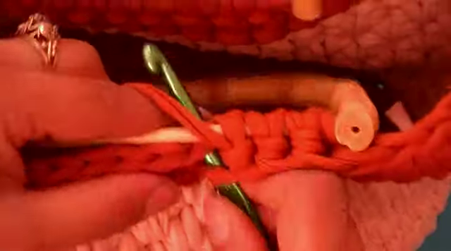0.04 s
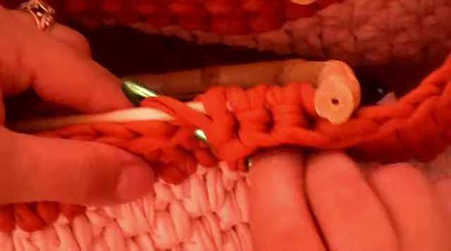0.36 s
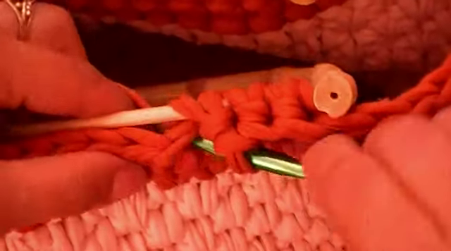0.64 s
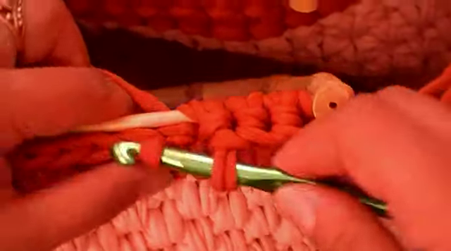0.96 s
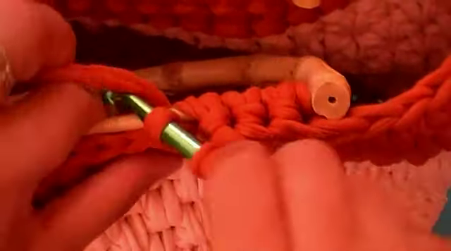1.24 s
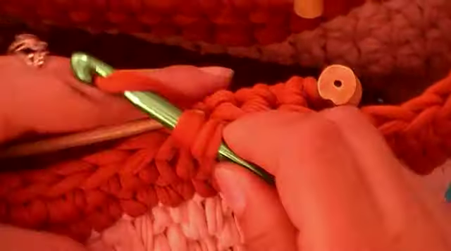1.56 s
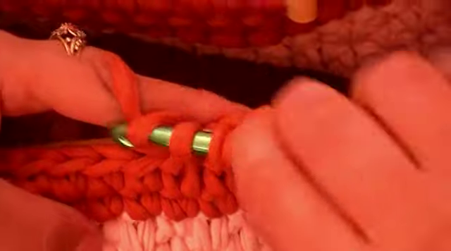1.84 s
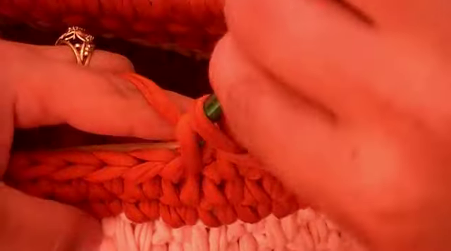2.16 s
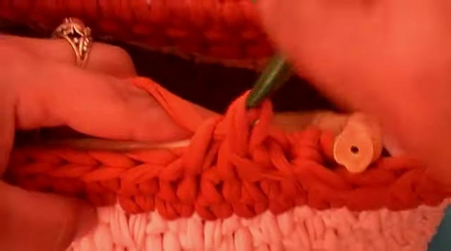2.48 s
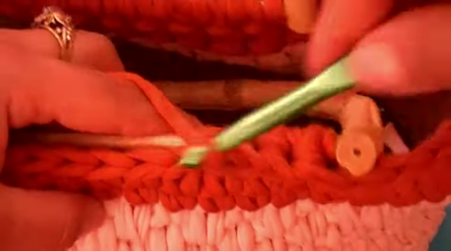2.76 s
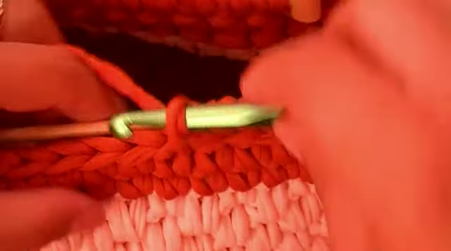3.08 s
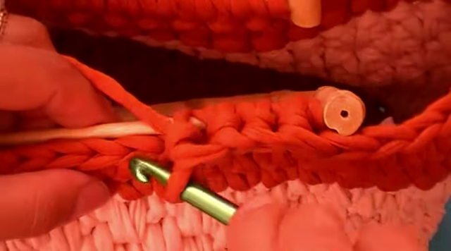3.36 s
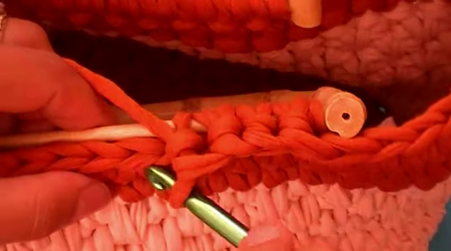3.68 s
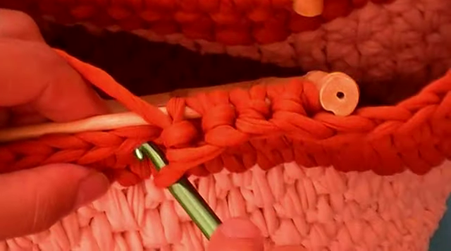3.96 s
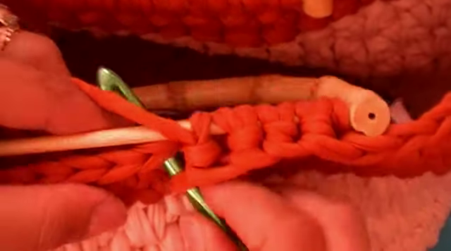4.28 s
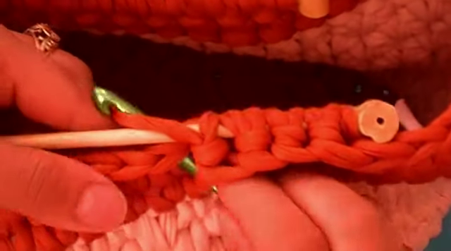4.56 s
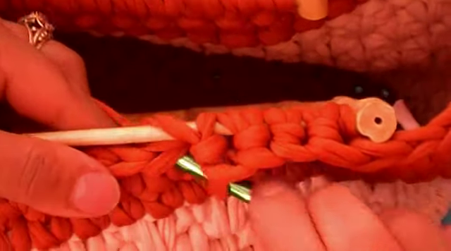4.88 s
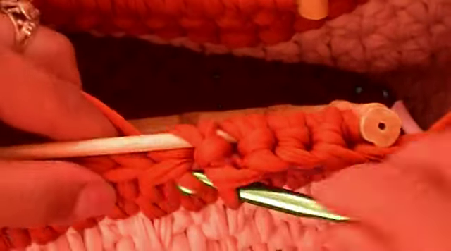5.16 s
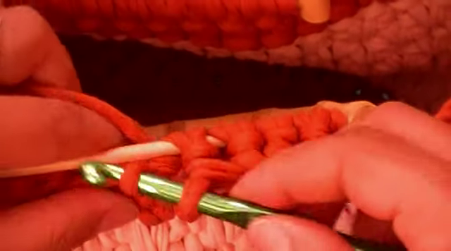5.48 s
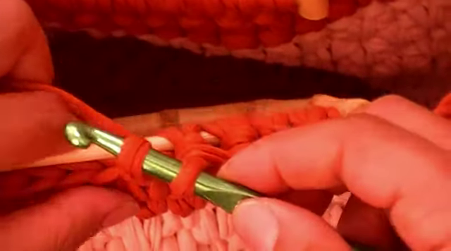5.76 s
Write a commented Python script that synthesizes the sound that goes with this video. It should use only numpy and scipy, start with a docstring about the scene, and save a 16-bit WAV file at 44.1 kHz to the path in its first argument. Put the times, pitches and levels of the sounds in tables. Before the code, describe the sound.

Faint, close crocheting with sliding yarn and clicks of hook on bamboo, briefly joined by a distant echoing clatter.

```python
"""Thick yarn hisses over a metal hook as it is crocheted round a thin wooden rod, close by.
Each pull makes countless tiny fibres slip and snag, and the hands shift the heavy fabric with a dull
rustle. The hook and the bag's bamboo handle give two sharp clicks and some light ticks.
Further off, something hard clatters three times and the room echoes.
Behind it all are a soft rush of air and the hum of an appliance."""
import sys
import numpy as np
from scipy import signal
from scipy.fft import rfft, irfft, next_fast_len
from scipy.io import wavfile
from scipy.ndimage import uniform_filter1d, map_coordinates

SR = 44100
rng = np.random.default_rng(int(sys.argv[2]) if len(sys.argv) > 2 else 0)


def store_wav(level_fs):
    """Save 16-bit WAV to argv[1]."""
    pcm = np.round(np.clip(np.atleast_2d(level_fs), -1, 1) * 32767)
    wavfile.write(sys.argv[1], SR, pcm.T.astype(np.int16))


N = 261513


# tone of the fibres' bright hiss (frequency [Hz], level [dB])
HISS_TONE = [(2500, -14), (5000, -7), (6500, -2), (8300, 3), (10000, -0.5), (12000, -11), (14500, -21),
             (16000, -54)]
# tone of strands rubbing on each other (frequency [Hz], level [dB])
RUB_TONE = [(300, 3.5), (900, 6.5), (1800, 6), (3000, 4), (4500, 2.5), (6500, -2.5), (10000, -30)]
# how alike the yarn sounds in both ears (frequency [Hz], likeness [-1 to 1])
YARN_LIKENESS = [(200, 0.29), (700, 0.63), (1300, 0.12), (2400, 0.83), (4400, 0.9), (8000, 1), (9000, 0.81),
                 (11000, 0.45), (15000, 1)]

def yarn(hiss_gain, rub_gain):
    """Strands hiss over the hook and rub on each other; the grip wavers as they are pulled."""
    grip = wobble(35)
    fibres = friction(snags_per_s=990, snag_share=0.4, spread_db=3)
    hiss = hiss_gain * amp(1.45 * grip) * stereo(fibres, HISS_TONE, YARN_LIKENESS)
    strands = friction(snags_per_s=450, snag_share=0.19, spread_db=4)
    rub = rub_gain * amp(1.63 * grip) * stereo(strands, RUB_TONE, YARN_LIKENESS)
    # one taut loop is dragged along the hook
    loop = friction(snags_per_s=780, snag_share=0.32, spread_db=-4)
    drag_tone = [(5000, -8), (6100, -4.5), (7500, 0.5), (9500, -14), (13000, -29)]
    drag_gain = amp(-52) * slide_speed(peak_s=5.595, length_s=0.15)
    return hiss + rub + drag_gain * stereo(loop, drag_tone, YARN_LIKENESS)


# each slide of yarn over hook, rod or fingers
# (time when fastest [s], length [s], hiss level [dB], pressure: rub compared with hiss [dB])
YARN_SLIDES = [(0.039, 0.079, -54, -2), (0.14, 0.21, -62, 0), (0.254, 0.076, -55, -0.5),
               (0.35, 0.19, -58, -1), (0.43, 0.058, -56.5, -0.5), (0.48, 0.055, -63, 5.5),
               (0.573, 0.071, -63, 1.5), (0.69, 0.071, -58.5, -0.5), (0.756, 0.17, -54.5, -1.5),
               (0.886, 0.099, -60, -1), (0.912, 0.082, -52, -6), (0.99, 0.14, -65, 1),
               (1.172, 0.15, -58, -2.5), (1.278, 0.17, -66, -8), (1.383, 0.019, -55, 1.5),
               (1.436, 0.12, -54, -1.5), (1.6, 0.27, -54, -5.5), (1.682, 0.088, -59.5, 3.5),
               (1.758, 0.046, -54.5, 3), (1.814, 0.19, -57.5, 4.5), (2.35, 0.089, -49, -20),
               (2.48, 0.089, -62, -7), (2.6, 0.18, -60.5, -4), (2.698, 0.16, -57, -11),
               (2.794, 0.09, -64, -2), (2.87, 0.079, -57.5, -5), (2.938, 0.066, -63.5, 1),
               (3.057, 0.22, -59.5, -5), (3.277, 0.13, -67, -3), (3.53, 0.029, -70, 1),
               (3.59, 0.02, -63.5, 2.5), (3.985, 0.069, -70.5, 2), (4.171, 0.12, -60.5, -0.5),
               (4.234, 0.044, -68, 8), (4.31, 0.088, -52.5, 1.5), (4.399, 0.14, -59, -0.5),
               (4.552, 0.14, -58.5, 0), (4.637, 0.099, -65.5, 1.5), (4.803, 0.11, -63, -1),
               (4.902, 0.1, -57.5, -0.5), (5.035, 0.12, -65.5, 2.5), (5.176, 0.092, -50, -5.5),
               (5.287, 0.072, -55, -1), (5.4, 0.35, -59.5, 0), (5.589, 0.15, -52.5, -15),
               (5.842, 0.18, -57.5, -2)]

def slide_gains():
    """Faster slides hiss and rub louder; pressing harder adds more rub."""
    # the yarn creeps a little even while it is only held
    hiss_power, rub_power = np.full(N, amp(-76) ** 2), np.full(N, amp(-81) ** 2)
    for s, length, db, pressure_db in YARN_SLIDES:
        speed = slide_speed(s, length)
        hiss_power += (amp(db) * speed) ** 2
        rub_power += (amp(db + pressure_db) * speed ** 0.9) ** 2  # rub grows more slowly than hiss
    return np.sqrt(hiss_power), np.sqrt(rub_power)


def slide_speed(peak_s, length_s):
    """The speed of one hand movement, 0 to 1: it builds up, peaks and eases off."""
    rise_share, roundness = 0.54, 1.5  # part spent speeding up; 1 = pointed peak, 2 = round bell
    t = np.arange(N) / SR - peak_s
    from_peak = np.abs(t) / (length_s * np.where(t < 0, rise_share, 1 - rise_share))
    return np.where(from_peak < 4, np.exp(-from_peak ** roundness), 0)


def friction(snags_per_s, snag_share, spread_db):
    """Countless tiny slips make two noises; in the first, single fibres also snag and let go."""
    snags = (rng.random(N) < snags_per_s / SR) * rng.standard_normal(N)
    snags *= amp(spread_db * rng.standard_normal(N))
    return noise_pair(N) + snag_share * unit(snags) * np.array([[1], [0]])


# tone of the fabric's dull rustle (frequency [Hz], level [dB])
FABRIC_TONE = [(60, 0), (180, -3.5), (290, 10), (450, 6), (700, -5.5), (1200, 2), (2500, -92)]

def fabric(rub_gain):
    """Every slide tugs the heavy fabric, which follows sluggishly with a dull, lumpy rustle."""
    rest_db, tug_db, smoothing_s = -65.5, -6, 0.16
    tug = amp(tug_db) * uniform_filter1d(rub_gain, round(smoothing_s * SR))
    lumps = amp(1.6 * wobble(22))
    rustle = friction(snags_per_s=170, snag_share=0.8, spread_db=-2.5)
    return np.hypot(amp(rest_db), tug) * lumps * stereo(rustle, FABRIC_TONE, YARN_LIKENESS)


# the hook scuffing through tight loops (time [s], level [dB], length [s])
HOOK_SCUFFS = [(0.714, -55.5, 0.0066), (1.672, -47, 0.0043), (1.783, -45, 0.0076), (2.705, -50.5, 0.0066),
               (4.398, -59, 0.0092)]
# tone of a scuff (frequency [Hz], level [dB])
SCUFF_TONE = [(70, -25), (150, -2), (300, 5), (540, 23), (740, 5), (1100, -30), (2000, -2), (4000, -1),
              (8000, -30), (13000, -33)]

def hook_scuffs():
    """The hook's head rasps briefly as it squeezes through a loop."""
    rasp = friction(snags_per_s=660, snag_share=0.29, spread_db=3)
    return swells(HOOK_SCUFFS) * stereo(rasp, SCUFF_TONE, YARN_LIKENESS)


# soft bumps of the hands on the bag (time [s], level [dB], length [s])
HAND_BUMPS = [(1.972, -53.5, 0.04), (4.31, -57.5, 0.022), (5.3, -67, 0.045)]
# folds of the fabric shifting (time [s], level [dB], length [s])
FOLD_SHIFTS = [(0.25, -62, 0.052), (1.86, -55, 0.056), (2.0, -55.5, 0.036), (2.38, -53, 0.03),
               (5.31, -55, 0.06), (5.57, -65, 0.06)]
# tone of a shifting fold (frequency [Hz], level [dB])
FOLD_TONE = [(150, -37), (240, 4), (320, 6), (420, -6), (700, -44)]

def hands_on_bag():
    """Hands bump the soft bag with a low thud and shift its folds with a hollow rustle."""
    thud_tone = [(60, -33), (115, 15.5), (170, 16), (260, -22), (600, -71)]
    thuds = swells(HAND_BUMPS) * stereo(noise_pair(N), thud_tone, likeness=[(150, 0.59)])
    folds = swells(FOLD_SHIFTS) * stereo(noise_pair(N), FOLD_TONE, likeness=[(300, 0.35)])
    return thuds + folds


# clicks and ticks of hook and handle
# (time [s], level [dB], ping pitch [Hz], ping [dB], hardness [Hz], bamboo ring [dB], crunch [dB])
HANDLE_CLICKS = [(1.1681, -35.5, 5500, -13, 4770, 22, 12.5), (1.667, -44.5, 3040, -4, 2290, -6, 4),
                 (1.775, -46, 2000, 3, 4800, -12, 1), (1.7771, -37, 1930, 1.5, 4630, -12, 6.5),
                 (3.5856, -62, 5000, -16, 6000, -8, -6), (4.217, -50, 4000, -11, 4500, -13, -12),
                 (4.2905, -50, 4500, 4, 4840, -2, 2), (4.296, -52, 4550, 16, 6000, 3, 22),
                 (4.3032, -44.5, 2440, 18.5, 3300, 22, 4), (4.3947, -40, 7900, -2, 6200, -18, 1),
                 (4.5125, -41.5, 5960, -14, 5130, -19, -2.5), (5.363, -48, 8600, 1, 6500, -10, 0)]

def clicks():
    """Hook and handle touch close by; the first moments of every snap make the room echo."""
    snap_s, echo_db = 0.018, -12
    direct, snaps = np.zeros(N), np.zeros(N)
    for s, db, *character in HANDLE_CLICKS:
        tap = amp(db) * bamboo_tap(*character)
        add(direct, s, tap)
        add(snaps, s, tap * fade(np.arange(len(tap)) / SR, snap_s))
    echo_tone = [(300, 10), (700, 2), (1040, 8.5), (1500, 1), (2400, 3.5), (4200, 0), (5600, -1),
                 (8300, 2), (14000, -21)]
    echo = room_echo(echo_tone, likeness=[(300, 0.11), (6000, 0.56)])
    return direct + amp(echo_db) * signal.fftconvolve(snaps[None], echo, axes=1)[:, :N]


# the notes that bamboo and rod ring with (pitch [Hz], level [dB], time to fade by 60 dB [s])
BAMBOO_NOTES = [(322, -32, 0.11), (432, -32, 0.066), (680, -60, 0.045), (1040, -19.5, 0.05),
                (1490, -26, 0.026), (2020, -25, 0.0099), (2250, -20, 0.019), (3110, -17, 0.02),
                (4020, -10.5, 0.0067), (4480, -13, 0.0089), (5520, -3, 0.0031), (6400, -11, 0.0054),
                (7300, -14.5, 0.01), (8100, -13, 0.013)]

def bamboo_tap(ping_hz, ping_db, hardness_hz, ring_db, crunch_db):
    """One tap: a push and rebound, a brief ping where it lands, the bamboo's ring and a crunch."""
    t = np.arange(SR // 5) / SR
    contact = 2 * np.pi * hardness_hz * (t - 0.00015)  # a harder tap is briefer and brighter
    push = -2.6 * contact * np.exp(-contact ** 2 / 2)
    ping = amp(ping_db) * fade(t, 0.011) * np.sin(2 * np.pi * ping_hz * t)
    ring = sum(amp(db + rng.normal(0, 1)) * fade(t, fade_s) * np.cos(2 * np.pi * hz * t)
               for hz, db, fade_s in BAMBOO_NOTES)
    treble_cut = signal.butter(4, min(2 * hardness_hz, 15000), fs=SR, output="sos")
    ring = signal.sosfilt(treble_cut, ring)
    # the crunch: between the clear notes lie many crowded ones that die at once
    band_hz = np.clip([hardness_hz / 2, 1.8 * hardness_hz], [100, 2000], [6000, 10000])
    band_filter = signal.butter(3, band_hz, "band", fs=SR, output="sos")
    crunch = fade(t, 0.018) * signal.sosfilt(band_filter, rng.standard_normal(len(t)))
    return push + ping + amp(ring_db) * ring + amp(crunch_db) * crunch


# the distant blows (time [s], level [dB])
CLATTER_BLOWS = [(1.906, -42.5), (2.0320, -40.5), (2.2210, -38)]
# tone of their echo (frequency [Hz], level [dB])
CLATTER_TONE = [(120, -20), (215, -11), (260, -2), (430, -2.5), (700, -1.5), (900, -6.5), (1550, -7.5),
                (2000, -2.5), (2700, -3), (3200, -6), (3600, -5), (4000, -10.5), (5200, -3.5), (6500, -6.5),
                (10800, -8), (14500, -41)]
# the notes the hard thing rings with (pitch [Hz], blur [Hz], level [dB], time to fade by 60 dB [s])
CLATTER_NOTES = [(283, 35, -9, .6), (430, 30, -12.5, .45), (525, 25, -14, .4), (665, 20, -8.5, .42),
                 (745, 30, -14, .35), (1370, 40, -12, .35), (2920, 240, 4.5, .62), (2970, 65, -1, .8),
                 (3289, 35, -5, .5), (3560, 130, -2, .35), (6055, 45, -3, .38), (6708, 45, -3.5, .38)]

def clatter():
    """Each far blow cracks; the echo builds behind it, a wall throws it back and a thin ring lingers."""
    out = np.zeros((2, N))
    t = np.arange(SR) / SR
    wall_delay_s, wall_db = 0.027, -6.5
    wall = amp(wall_db) * np.exp(-((t - wall_delay_s) / 0.02) ** 2)
    build_up = 1 - np.exp(-t / 0.0033)
    likeness = [(150, 0.2), (400, 0.93), (1300, 0.74), (4000, 0.8), (8000, 0.42), (14000, 0.11)]
    for s, db in CLATTER_BLOWS:
        echo = room_echo(CLATTER_TONE, likeness)[:, :SR]
        echo /= np.std(echo[:, :SR // 40])  # its first 25 ms set the level
        add(out, s, amp(db) * np.hypot(build_up, wall) * echo)
        add(out, s - 0.006, amp(db) * crack(t))
        for hz, blur_hz, note_db, fade_s in CLATTER_NOTES:
            ring_gain = amp(db + note_db - 11) * fade(t, fade_s) * build_up
            add(out, s, ring_gain * blurred_ring(hz, blur_hz))
    return out


# the short, woody notes in each blow's crack (pitch [Hz], level [dB])
CRACK_NOTES = [(700, -3), (1350, -6.5), (2100, -13), (2920, -5), (3520, 1.5), (4850, -6), (5300, -11),
               (6050, 3.5), (6750, 0.5), (9900, -6), (10950, -6)]

def crack(t):
    """The start of a far blow: hollow notes and gritty noise flare up for a few milliseconds."""
    flare = np.exp(-np.abs(t - 0.0075) / 0.003)
    grit_tone = [(300, -8), (2000, 0), (3300, 6), (4300, -0.5), (6300, 5.5), (9000, -0.5), (15000, -19)]
    grit = stereo(noise_pair(SR), grit_tone, likeness=[(300, 0.67)])
    hollow = sum(amp(db + rng.normal(0, 1)) * np.sin(2 * np.pi * (hz * t + rng.random()))
                 for hz, db in CRACK_NOTES)
    return flare * (amp(0.5) * hollow + amp(7.5) * grit)


def blurred_ring(hz, blur_hz):
    """One second of a note smeared by many reflections, a little differently in each ear."""
    shared, left, right = [(wobble(blur_hz) + 1j * wobble(blur_hz))[:SR] for _ in range(3)]
    flutter = shared + 0.45 * np.array([left, right])
    return unit(np.real(flutter * np.exp(2j * np.pi * hz * np.arange(SR) / SR)))


# how long the room echoes (frequency [Hz], time to fade by 60 dB [s])
ECHO_TIMES = [(200, 0.89), (1000, 0.71), (3000, 0.59), (7000, 0.53), (13000, 0.34)]

def room_echo(tone, likeness):
    """The room's reflections blend into a fading noise; the treble dies first."""
    hz, _, bands = signal.stft(noise_pair(SR), SR, nperseg=256)
    t = np.arange(bands.shape[-1]) * 128 / SR
    bands = bands * fade(t, along(ECHO_TIMES, hz)[:, None])
    _, echo = signal.istft(bands, SR, nperseg=256)
    return stereo(echo, tone, likeness) / np.sqrt(echo.shape[-1])


# how the appliance's deepest note swells and sinks (time [s], level [dB])
DRONE_LEVELS = [(0, -61), (1.05, -61.5), (2.25, -70.5), (3.4, -62), (4.5, -61.5), (5.65, -69)]
# the notes of its hum (pitch [Hz], level [dB])
HUM_NOTES = [(95.1, -72), (142.4, -80), (189.5, -73.5), (237, -75.5), (282, -76), (523, -79), (1147, -86),
             (1260, -81.5)]
# the notes of its faint whine (pitch [Hz], level [dB])
WHINE_NOTES = [(2525, -79.5), (3187, -86.5), (3214, -89)]
# how the whole whine rises and falls (time [s], level change [dB])
WHINE_CHANGES = [(0, -1), (3.9, 0), (4.6, 2.5), (5.2, 2.5), (5.6, -1)]

def appliance():
    """An appliance gives a deep drone, a hum and a faint whine, all slightly unsteady."""
    drone_hz = 47.7
    phase_per_hz = 2 * np.pi * np.arange(N) / SR
    drone_gain = amp(over_time(DRONE_LEVELS) - 0.5 * wobble(5.6))
    drone = drone_gain * np.sin(drone_hz * phase_per_hz + 0.12 * wobble(3.96))
    hum, whine = np.zeros(N), np.zeros(N)
    for hz, db in HUM_NOTES:
        gain = amp(db + 0.65 * wobble(6.8))
        hum += gain * np.sin(hz * phase_per_hz + 0.06 * np.sqrt(hz) * wobble(5))
    for hz, db in WHINE_NOTES:
        gain = amp(db + 2.4 * wobble(18))
        whine += gain * np.sin(hz * phase_per_hz + 1.6 * wobble(6) + 0.6 * wobble(30))
    return np.sqrt(2) * (drone + hum + amp(over_time(WHINE_CHANGES)) * whine)


# tone of the air in the room (frequency [Hz], level [dB])
AIR_TONE = [(25, 1), (45, 4.5), (66, 1), (82, -8), (125, 1.5), (210, -3.5), (300, 0.5), (530, -6),
            (800, -6), (1150, -9.5), (1700, -13), (5000, -23.5), (12500, -35), (15500, -67)]
# how alike the air sounds in both ears (frequency [Hz], likeness [-1 to 1])
AIR_LIKENESS = [(40, 0.86), (120, -0.49), (300, -0.77), (1000, -0.6), (4000, -0.18), (12000, -0.29)]

def room_air():
    """The air in the room makes a soft, low, steady rush."""
    return amp(-55.5) * stereo(noise_pair(N), AIR_TONE, AIR_LIKENESS)


def amp(db):
    """Turn decibels into a gain: the number to multiply a sound by."""
    return 10 ** (np.asarray(db) / 20)


def fade(t, fade_s):
    """A gain that drops by 60 dB every fade_s seconds."""
    return amp(-60 * t / fade_s)


def swells(rows):
    """A gain that rises and falls round each (time [s], level [dB], length [s]) row."""
    return sum(amp(db) * np.exp(-np.abs(np.arange(N) / SR - s) / length) for s, db, length in rows)


def unit(x):
    """Scale a sound to an average strength (rms) of 1."""
    return x / np.sqrt(np.mean(x ** 2) + 1e-20)


def along(points, hz):
    """Read between (frequency [Hz], value) points, with octaves evenly spaced."""
    frequencies, values = np.transpose(points)
    return np.interp(np.log(hz + 1), np.log(frequencies + 1), values)


def over_time(points):
    """Join (time [s], value) points with straight lines, one value per sample."""
    return np.interp(np.arange(N) / SR, *np.transpose(points))


def wobble(per_s):
    """A smooth curve through per_s random values a second."""
    values = rng.standard_normal(int(N * per_s / SR) + 4)
    steps = np.arange(0, N, 64)
    return np.interp(np.arange(N), steps, map_coordinates(values, [steps * per_s / SR]))


def noise_pair(samples):
    """Two unrelated white noises."""
    return rng.standard_normal((2, samples))


def filtered(x, gain_at):
    """Turn each frequency of a sound up or down by gain_at(hz)."""
    n = x.shape[-1]
    padded = next_fast_len(n + 8192)
    return irfft(rfft(x, padded) * gain_at(np.fft.rfftfreq(padded, 1 / SR)), padded)[..., :n]


def stereo(pair, tone, likeness):
    """Mix two unrelated sounds into left and right with this tone; likeness 1 makes both the same."""
    def gains(hz):
        angle = np.arccos(np.clip(along(likeness, hz), -1, 1)) / 2
        return amp(along(tone, hz)) * [np.cos(angle), np.sin(angle)]
    mid, side = filtered(pair, gains)
    return unit(np.array([mid + side, mid - side]))


def add(track, s, sound):
    """Lay a sound into a track, starting at s seconds."""
    part = track[..., round(s * SR):][..., :sound.shape[-1]]
    part += sound[..., :part.shape[-1]]


def scene():
    """The crochet work and the room behind it, all a little to the right."""
    hiss_gain, rub_gain = slide_gains()
    crochet = yarn(hiss_gain, rub_gain) + fabric(rub_gain) + hook_scuffs() + hands_on_bag() + clicks()
    return (crochet + clatter() + appliance() + room_air()) * amp([[-0.6], [0.6]])


def record(dry):
    """Cut away the deepest bass and the highest treble."""
    bottom_hz, top_hz = 39, 16700
    return filtered(dry, lambda hz: (hz < top_hz) / (1 + (bottom_hz / (hz + 1)) ** 20))


dry = scene()
out = record(dry)
store_wav(out)
```